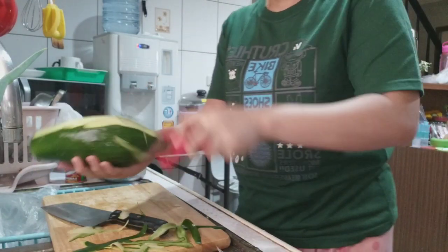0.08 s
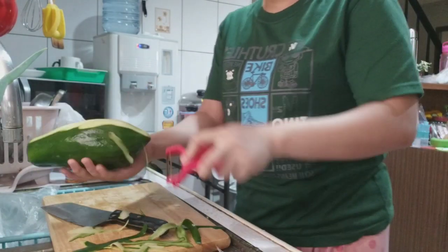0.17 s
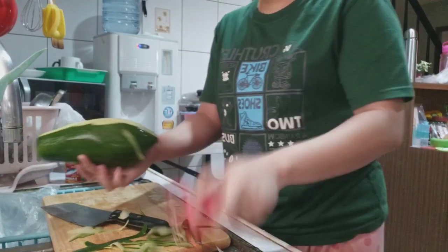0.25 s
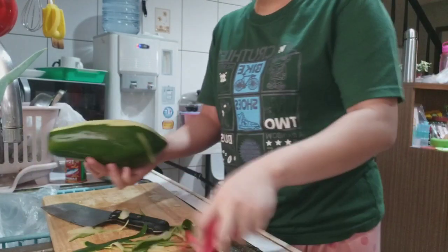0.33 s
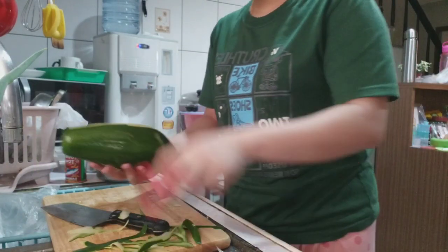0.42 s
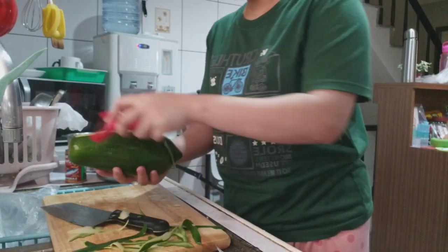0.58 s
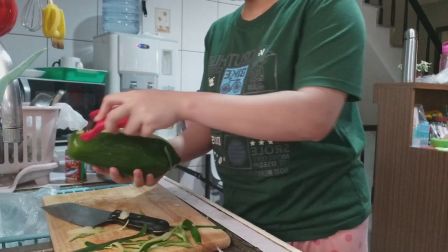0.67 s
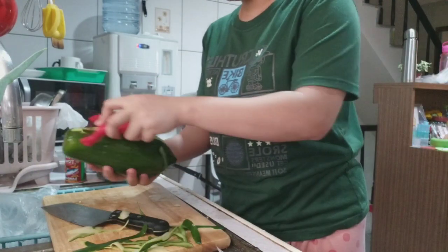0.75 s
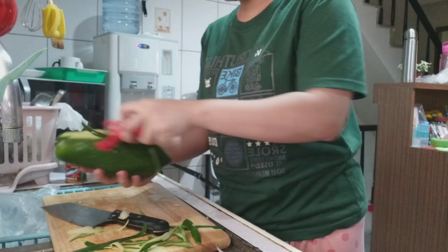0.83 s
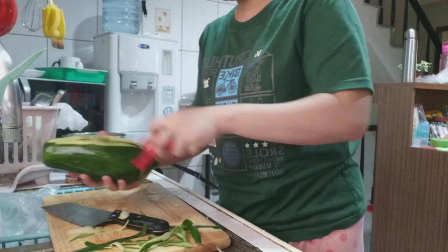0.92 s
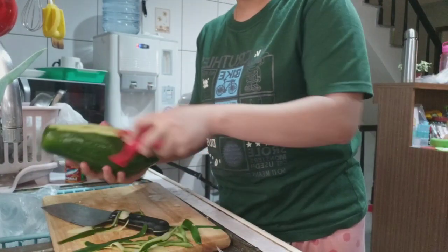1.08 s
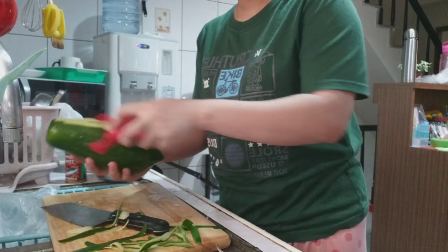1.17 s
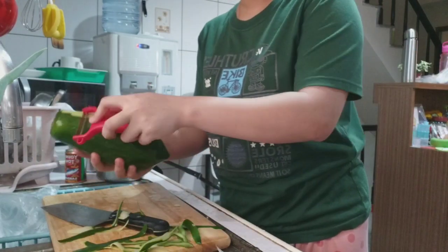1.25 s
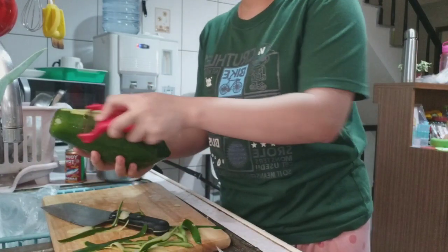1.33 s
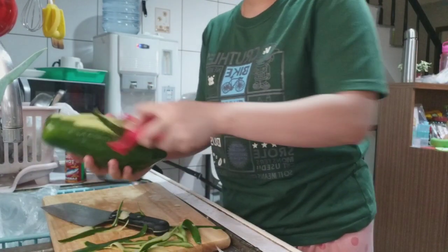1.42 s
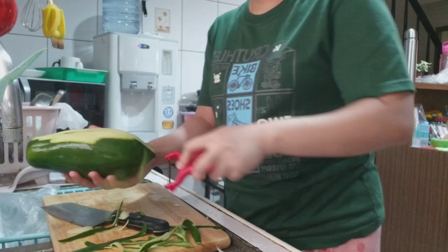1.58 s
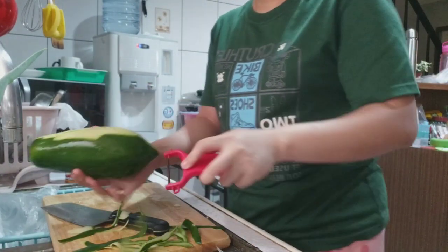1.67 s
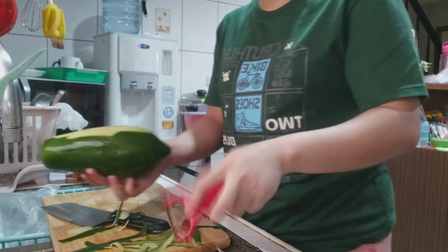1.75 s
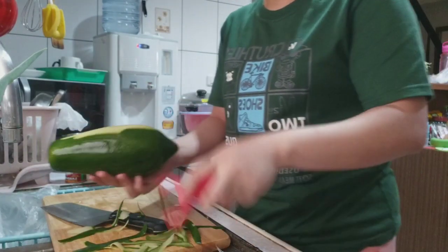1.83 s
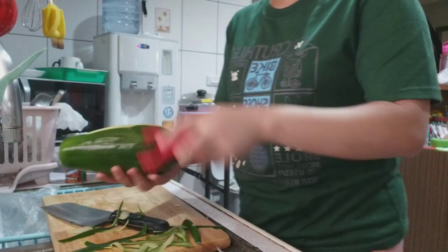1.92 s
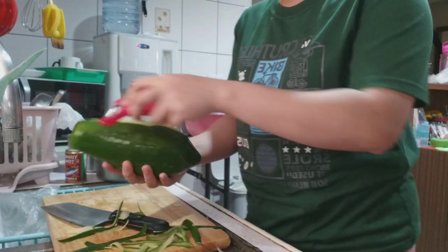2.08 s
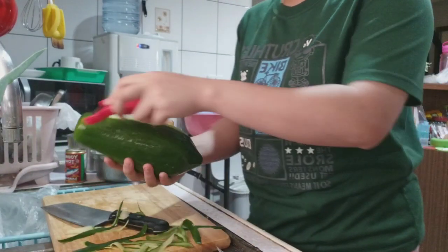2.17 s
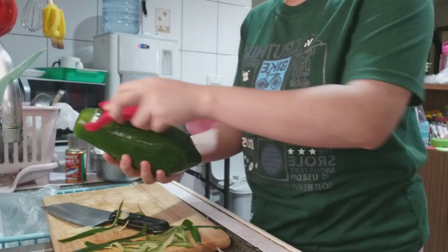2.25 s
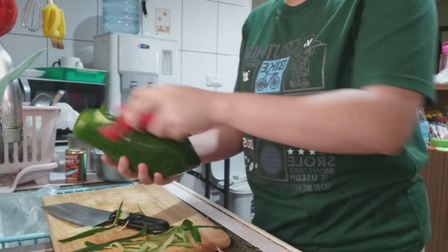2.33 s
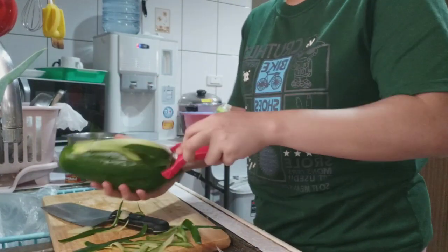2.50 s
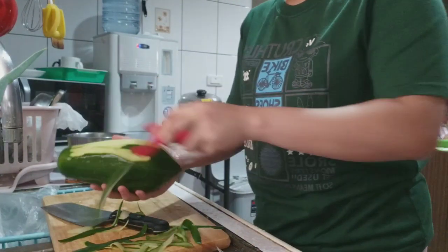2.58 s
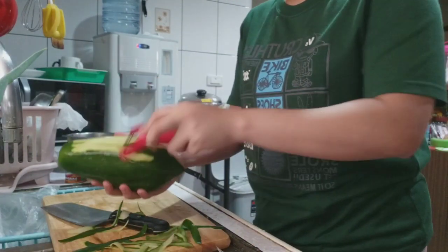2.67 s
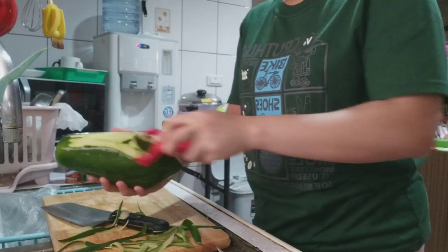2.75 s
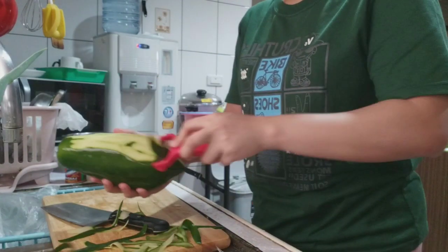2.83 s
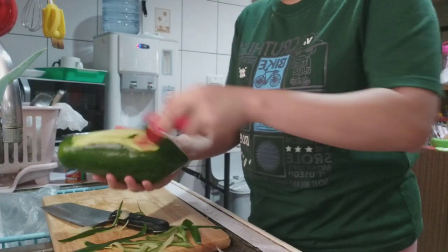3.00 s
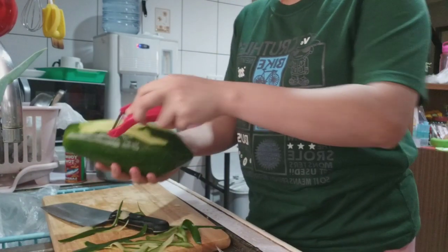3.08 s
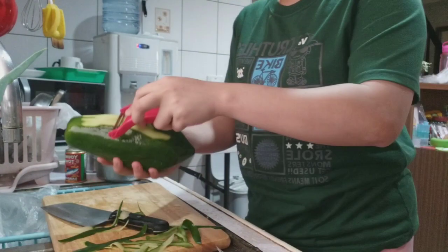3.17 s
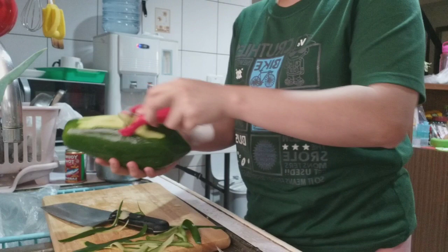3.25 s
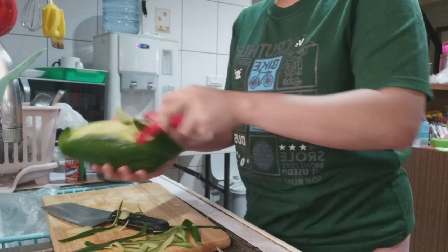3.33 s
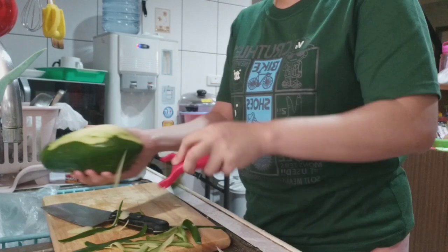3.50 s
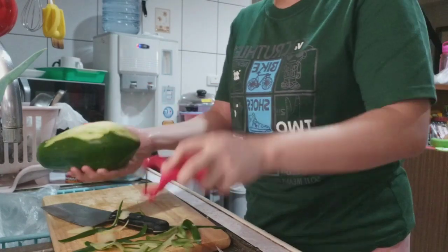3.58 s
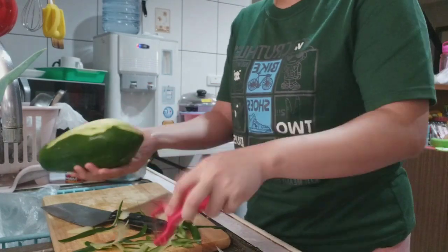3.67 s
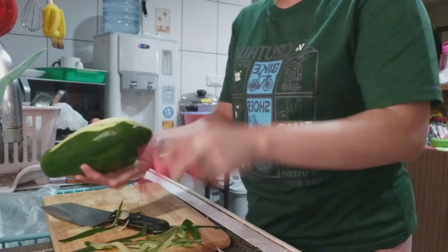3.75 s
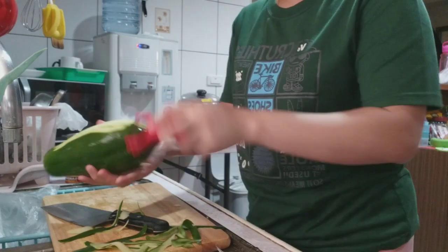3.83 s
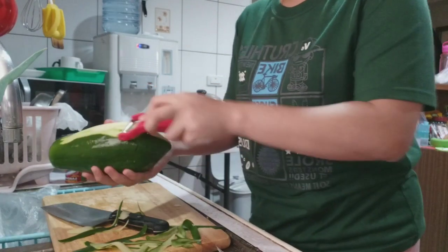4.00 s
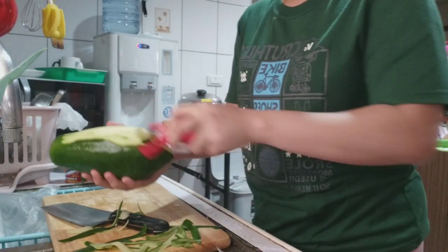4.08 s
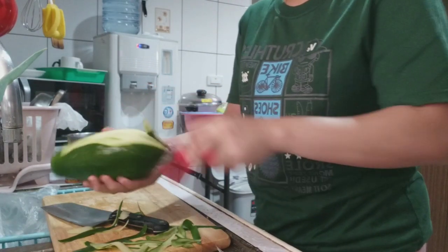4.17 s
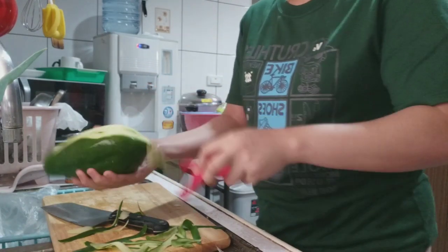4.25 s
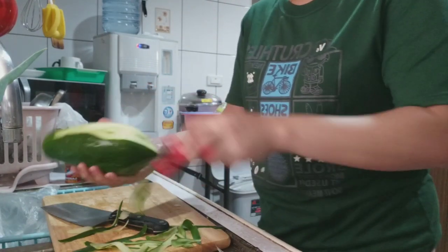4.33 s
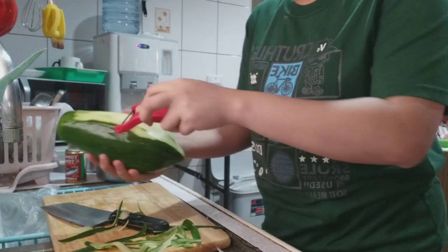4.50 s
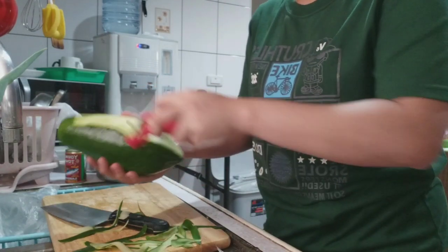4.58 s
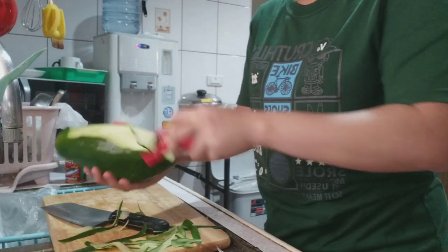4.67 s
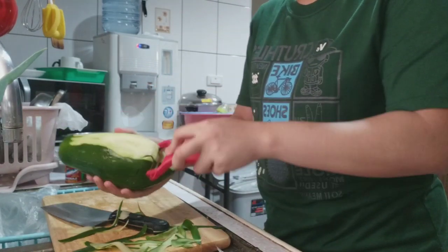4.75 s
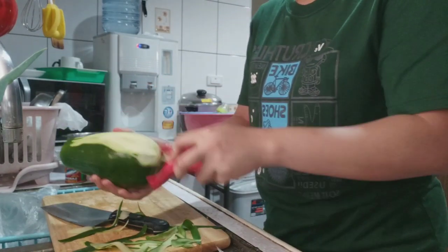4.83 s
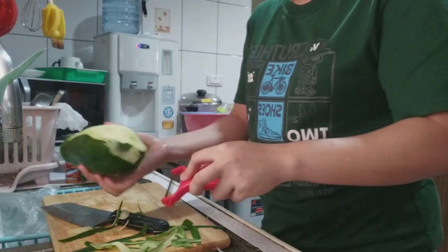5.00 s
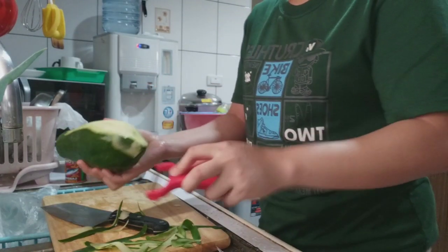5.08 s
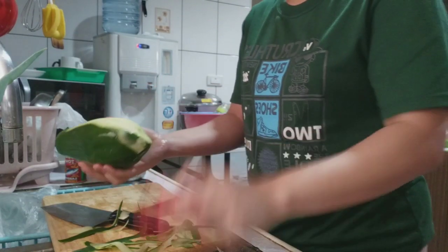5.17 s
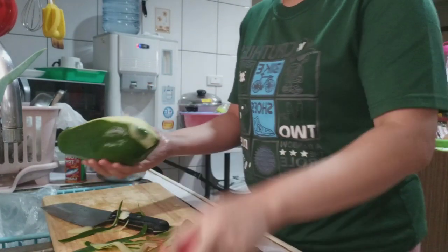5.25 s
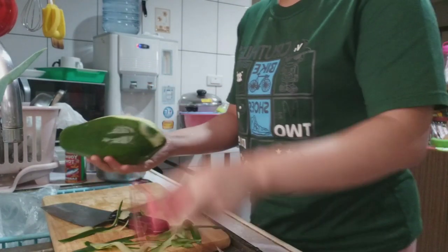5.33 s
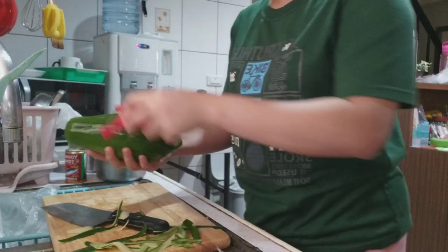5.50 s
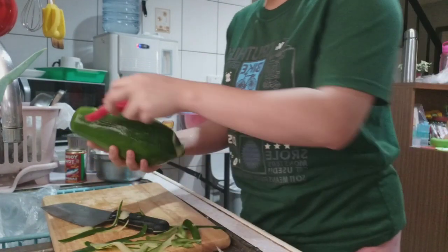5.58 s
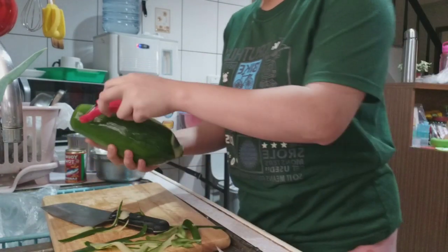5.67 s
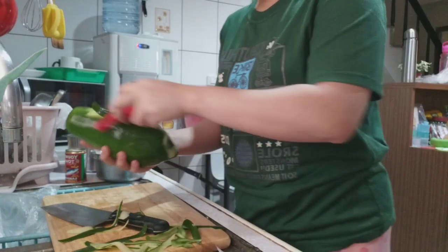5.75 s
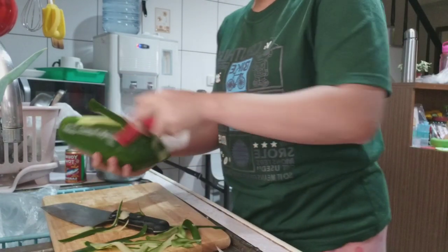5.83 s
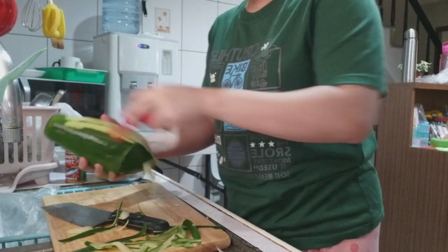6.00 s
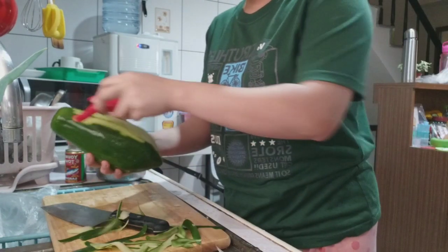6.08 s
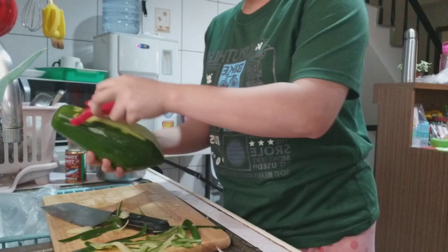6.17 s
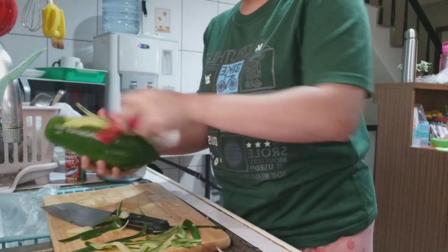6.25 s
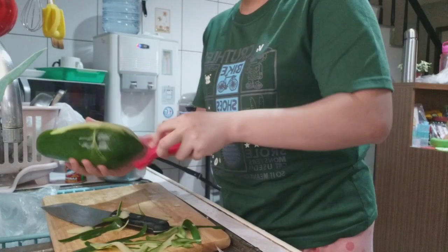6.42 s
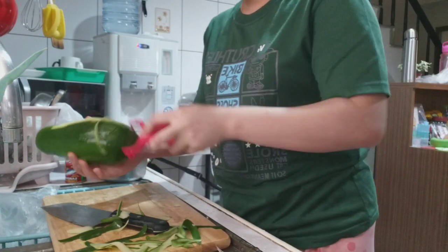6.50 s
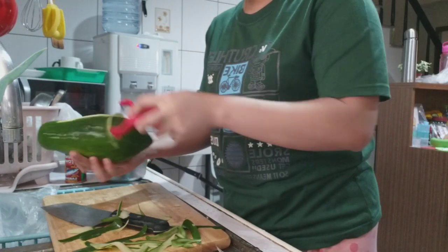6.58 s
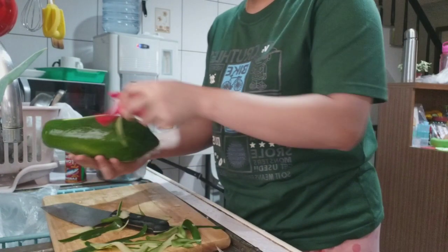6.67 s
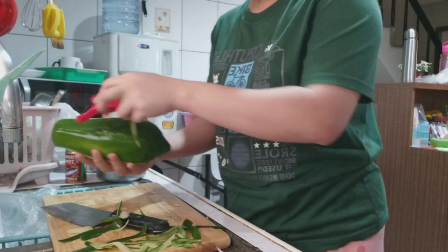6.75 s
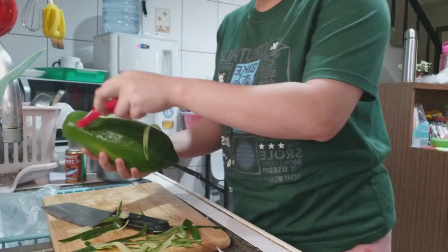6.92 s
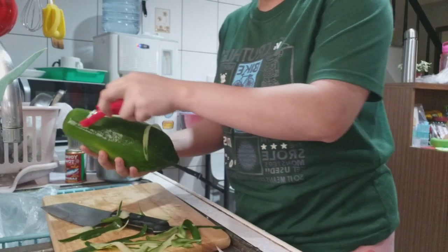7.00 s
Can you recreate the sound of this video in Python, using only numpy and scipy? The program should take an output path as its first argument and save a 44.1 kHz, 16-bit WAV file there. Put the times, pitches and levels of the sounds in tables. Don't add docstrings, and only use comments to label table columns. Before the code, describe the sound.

At arm's length in a tiled kitchen, a plastic-handled peeler works over a firm green fruit. A strong scrape is already underway at 0 s, fading into a small rattle; a brief nip follows at 0.2 s. A loud bite at 0.7 s opens a longer crackling tear, then another at 1.25 s, followed by loose clicks around 1.5 s and a light nip at 1.75 s. Strokes return at 2.2 and 2.7 s, the latter sharply bitten with a dull knock, and at 3.2 s, with faint fumbling until 3.9 s. The loudest bite lands near 3.95 s, with a rattle and ping at 4.16 s. A hollow double knock and bright scrape come at 4.5 s, a clear steel ping at 4.85 s. After quiet touches, weighty strokes rasp at 5.65 and 6.15 s; a weak last scrape starts near 6.9 s. Faint fridge hum and hiss continue throughout.

```python
import sys
import numpy as np
from scipy import signal
from scipy.fft import rfft, irfft
from scipy.io import wavfile
from scipy.ndimage import uniform_filter1d

SR = 44100
rng = np.random.default_rng(int(sys.argv[2]) if len(sys.argv) > 2 else 0)


def unload_wav(signal):
    wavfile.write(
        sys.argv[1],
        SR,
        np.round(np.clip(np.atleast_2d(signal).T, -1, 1) * 32767).astype(np.int16),
    )


def to_linear_factor(level_db):
    exponent = np.asarray(level_db, float) / 20
    return 10 ** exponent


N = 310023
T = np.arange(N) / SR


def peeler():
    judder = unit(to_linear_factor(1.7 * walk(380) + 0.5 * walk(60)))
    coarse, fine = snaps(7000, 0.64), snaps(22000, 1.1)
    drag, press, trail = strokes()
    bite, tick = bites(), rattles()
    wet = wetness()
    sound = plastic_frame(coarse, judder, drag, trail, bite[0])
    sound += fruit(coarse, judder, press, bite[1])
    sound += cutting_edge(fine, judder, wet, drag, bite[2] + tick[2])
    sound += juice(judder, wet, drag, bite[3] + tick[3])
    return sound + loose_handle(fine, tick[0], tick[1])


# (blade lands [s], drag at landing [dB], swell [s],
# drag at peak [dB], held after peak [s])
STROKE_ROWS = [(0.0, -20.5, 0.013, -26, 0.049), (0.245, -45, 0.023, -49, 0.0071),
               (0.701, -38.5, 0.13, -26, 0.052), (1.279, -41.5, 0.11, -27.5, 0.096),
               (2.218, -41, 0.15, -25.5, 0.061), (2.707, -33.5, 0.083, -35.5, .005),
               (3.171, -40.5, 0.16, -31.5, 0.075), (3.997, -32.5, 0.048, -33.5, 0.089),
               (4.544, -35, 0.061, -31.5, 0.052), (4.791, -45, 0.022, -50, 0.0065),
               (5.667, -44, 0.083, -30, 0.098), (6.155, -37.5, 0.15, -32.5, 0.04),
               (6.945, -42, 0.15, -40, 0.15)]


def strokes():
    land_s, sag_db_per_s, let_go_db_per_s = 0.02, 49.5, 315.5
    drag, press, trail = np.zeros((3, N))
    for s, land_db, swell, peak_db, held in STROKE_ROWS:
        t, end = T - s, swell + held
        end_db = peak_db - sag_db_per_s * held
        after = np.clip(T - s - end, 0, 2)
        drag_db = np.interp(t, [0, swell, end], [land_db, peak_db, end_db])
        on = np.clip(t / land_s + 1, 0, 1) * to_linear_factor(drag_db)
        force = on * to_linear_factor(-let_go_db_per_s * after)
        drag += force
        trail += on * to_linear_factor(-27 - 115.5 * after)
        press += force * to_linear_factor(np.interp(t, [0, end, end + 0.038], [-19, -7.5, -19.5]))
    return drag, press, trail


# (time [s], peak level [dB], brightness [dB],
# weight on the fruit [dB], decay T60 [s])
BITE_ROWS = [
    (0.216, -25.5, -10, -30, 0.056),
    (0.6784, -16.5, -8, -25.5, 0.09),
    (1.2353, -27.5, -14, -14, 0.083),
    (1.7402, -32.5, -3.5, -20, 0.086),
    (2.6615, -18.5, -3.5, -19, 0.1),
    (3.9615, -13, -9, -22, 0.085),
    (4.775, -35.5, -4.5, -22, 0.23),
    (5.6199, -24.5, -4.5, -13, 0.11),
    (6.1244, -28.5, -2.5, -9, 0.086),
]
# (time [s], peak level [dB], brightness [dB],
# weight on the fruit [dB], decay T60 [s])
LEAN_ROWS = [
    (1.2463, -20, -8.5, -26, 0.086),
    (2.192, -27, -4.5, -15.5, 0.074),
    (3.14, -31.5, -3.5, -20, 0.049),
    (3.338, -31.5, -3, -24, 0.076),
    (3.357, -21, -27, -12, 0.048),
    (4.5111, -22.5, 0, -16, 0.077),
    (6.912, -28.5, -5.5, -16, 0.068),
]
# (edge [dB], edge share of brightness, juice [dB], juice share of brightness)
BITE_BALANCE = (0.5, 1.36, -6, 0.67)


def bites():
    sharp = tap_force(BITE_ROWS, BITE_BALANCE, rise_s=0.0029, lead_s=0.0016)
    return sharp + tap_force(LEAN_ROWS, BITE_BALANCE, rise_s=0.006, lead_s=0.0042)


# (time [s], peak level [dB], brightness [dB],
# weight on the handle [dB], decay T60 [s])
RATTLE_ROWS = [(0.1171, -24.5, -6, -26, 0.089), (0.9504, -34.5, -8.5, -17, 0.13),
               (1.5015, -26.5, -16, -24, 0.1), (1.5764, -49, -10, -23, 0.12),
               (1.6851, -34.5, -21.5, -16, 0.2), (2.5078, -38.5, -11.5, -8, 0.1),
               (2.617, -48.5, -6.5, -10, 0.31), (2.6824, -52, -5, -22, 0.2), (2.9911, -42, -5, -16, 0.18),
               (3.239, -29, -28, -29, 0.29), (3.414, -27.5, -11, -18, 0.098), (3.5653, -47, 8.5, -10, 0.18),
               (3.6321, -45, 9.5, -10, 0.15), (4.1599, -25, -3, -7, 0.087),
               (4.7324, -36.5, -17, -15, 0.091), (4.7504, -40, -5, -14, 0.15),
               (4.8344, -31.5, -6, -5, 0.12), (4.8484, -39, 5, -13, 0.11), (5.119, -41, -1.5, -8, 0.29),
               (5.1861, -38, -12, -5, 0.072), (5.4705, -48, -15, -9.5, 0.29),
               (5.88, -30.5, -18.5, -16, 0.084), (6.354, -30, -7.5, -12, 0.14)]
# (time [s], peak level [dB], brightness [dB],
# weight on the handle [dB], decay T60 [s])
TOUCH_ROWS = [(3.125, -47, -19, -5, .15), (4.472, -61, -17, -7, 0.36), (0.291, -40, -18, -17, 0.068),
              (0.3284, -69, 14, -13, 0.13), (0.4574, -58, -3, -4, 0.073), (1.0644, -51.5, 0, -4.5, 0.082),
              (2.0594, -62.5, -7, 0, 0.13), (2.9644, -56, -6, -3, 0.41), (3.0944, -53, 5, -5, 0.14),
              (3.5244, -51, -2, -16, 0.14), (3.5503, -54.5, 2, -10, 0.17), (3.8, -58.5, -14, -1, 0.33),
              (3.8516, -51, -18.5, -1.5, 0.14), (3.8984, -46, -13, -13, 0.26), (3.93, -53, -16, -5, 0.22),
              (5.2599, -58.5, 9, -20.5, 0.12), (6.0384, -55, 11.5, -4, 0.22), (6.6194, -81, 19, -2, 0.13),
              (6.7401, -61.5, -5, -3, 0.099)]


def rattles():
    rattle = tap_force(RATTLE_ROWS, (-1.3, 0.67, 0.3, 1.31), rise_s=0.0003)
    touch = tap_force(TOUCH_ROWS, (-5.5, 0.4, 0.3, 1.17), rise_s=0.0004)
    return to_linear_factor(-3.5) * (rattle + touch)


# (time [s], level [dB])
WETNESS_POINTS = [(0.05, -2.3), (0.85, -2.2), (1.4, -1), (2.35, -0.5), (2.75, 4.5), (3.3, 1), (4.1, 2.5),
                  (4.6, 3.5), (4.85, 6.5), (5.75, 1.3), (6.2, 0.5), (6.35, 0), (7.0, -4.5)]


def wetness():
    return to_linear_factor(np.interp(T, *np.transpose(WETNESS_POINTS)))


# (frequency [Hz], width [Hz], level [dB])
FRAME_MODES = [(2480, 260, -7), (2850, 260, 0), (3230, 220, -3), (3500, 180, -4), (3820, 220, 0),
               (4170, 320, -5), (4750, 800, -12)]
# (frequency [Hz], width [Hz], level [dB])
HOLLOW_MODES = [(2787, 100, 0.5), (2815, 99, 2.5)]
# (frequency [Hz], width [Hz], level [dB])
JAW_MODES = [(2696, 390, 0.5), (3267, 294, 2), (3640, 270, 2.5), (4280, 120, 1.5)]


def plastic_frame(coarse, judder, drag, trail, bite):
    hard_db = -21
    hard = to_linear_factor(hard_db - 4) * (drag / to_linear_factor(hard_db)) ** 1.04
    frame = body(coarse * judder * to_linear_factor(-1.5) * (drag + trail), FRAME_MODES, patchy_db=2.0, rate=25)
    hollow = body(coarse * judder * hard, HOLLOW_MODES, patchy_db=3.0, rate=34)
    jaws = body(coarse * to_linear_factor(-4) * bite, JAW_MODES, patchy_db=1.2, rate=15)
    return frame + hollow + jaws


# (frequency [Hz], width [Hz], level [dB])
FRUIT_MODES = [(923, 300, -8.5), (1347, 153, 0.5), (1592, 98, 4), (1898, 208, 2), (2265, 130, 2)]
# (frequency [Hz], width [Hz], level [dB])
FLESH_MODES = [(520, 150, -2), (670, 170, 0), (860, 200, -4)]


def fruit(coarse, judder, press, bite):
    firm_db = -31
    deep = to_linear_factor(firm_db - 17.5) * (press / to_linear_factor(firm_db)) ** 1.49
    whole = body(coarse * (judder * press + bite), FRUIT_MODES, patchy_db=3.0, rate=27)
    return whole + body(coarse * judder * deep, FLESH_MODES, patchy_db=1.5, rate=25)


# (frequency [Hz], width [Hz], level [dB])
EDGE_MODES = [(4820, 350, -7.5), (5676, 487, 1), (6460, 636, -3.5), (7880, 1700, -8)]


def cutting_edge(fine, judder, wet, drag, taps):
    tearing = judder ** 0.37 * wet * saturate(drag, db=-4, cap_db=-43)
    edge = body(fine * tearing, EDGE_MODES, patchy_db=2.5, rate=40)
    return edge + body(fine * taps, EDGE_MODES, patchy_db=6.45, rate=40)


# (frequency [Hz], width [Hz], level [dB])
SIZZLE_MODES = [(8420, 2000, -3), (9890, 1200, 1), (11420, 1400, -0.5), (13800, 1300, 1),
                (15000, 820, -4.5)]


def juice(judder, wet, drag, taps):
    spray = judder ** 0.35 * wet * saturate(drag, db=-6, cap_db=-33.5) + taps
    return body(snaps(22000, 1.5) * spray, SIZZLE_MODES, patchy_db=2.5, rate=32)


# (frequency [Hz], width [Hz], level [dB])
PIVOT_MODES = [(2750, 550, -2), (3450, 750, 0), (4350, 800, -3)]
# (frequency [Hz], width [Hz], level [dB])
HANDLE_MODES = [(1450, 500, -13), (1900, 150, 0)]


def loose_handle(fine, pivot_force, handle_force):
    pivots = body(fine * pivot_force, PIVOT_MODES, patchy_db=1.0, rate=28)
    return pivots + body(fine * handle_force, HANDLE_MODES, patchy_db=4.5, rate=28)


# (time [s], peak level [dB], lower mode [dB rel],
# upper mode [dB rel], freedom to ring [0-1])
PING_ROWS = [(0.1156, -46.5, 13.5, -10, 0.7), (0.1344, -59, -1, -9, .55), (0.2204, -51, 4, -3, .6),
             (0.2753, -46, 3, -16, 0.5), (0.9497, -53, 1, -20, .5), (1.5014, -57, 6, -4, .5),
             (1.7434, -45, 5, 3, 0.8), (3.6331, -39, -13.5, -2.5, .7), (4.1634, -31, -6, -2, 0.7),
             (4.8484, -23.5, -6, -14, 0.67), (5.1224, -50, 4, 11.5, .6), (5.2599, -60, -11.5, -23, 0.5),
             (6.372, -62, 14, -4, .6)]
# (frequency [Hz], decay T60 [s])
BLADE_MODES = [(11670, .085), (9500, 0.085), (15050, .09)]


def blade():
    out, t = np.zeros(N + SR // 2), T[:SR // 2]
    phases = rng.random((len(PING_ROWS), 3))
    for (s, db, *rel_db, free), phase in zip(PING_ROWS, phases):
        k = int(s * SR)
        for (hz, t60), rel, turn in zip(BLADE_MODES, [0, *rel_db], phase):
            pair = np.sin(2 * np.pi * hz * t) + 0.51 * np.sin(2 * np.pi * ((hz + 18) * t + turn))
            ring_s = 2.5 * t60 * np.clip(free, 0.1, 1.5)
            decay = (1 - np.exp(-t / 0.0092)) * 1000. ** (-t / ring_s)
            out[k:k + len(t)] += to_linear_factor(db + rel - 5.5) * pair * decay
    return out[:N] * to_linear_factor(1.7 * walk(70))


# (middle [s], half length [s], level [dB], pitch [Hz])
DIG_ROWS = [(0.042, 0.016, -41, 1040), (0.823, 0.043, -50.5, 603), (0.898, .03, -55, 1200),
            (1.407, 0.057, -55, 605), (2.447, 0.037, -63, 800), (3.25, 0.023, -62.5, 970),
            (3.377, 0.016, -51.5, 687), (4.126, 0.027, -51.5, 820), (4.628, 0.037, -38, 1394),
            (4.623, 0.043, -51, 357), (5.783, .05, -56.5, 612), (5.757, 0.025, -55, 1070),
            (6.308, 0.019, -51.5, 850)]


def digs():
    tearing, out = snaps(1500, 2.1), np.zeros(N)
    for s, half, db, hz in DIG_ROWS:
        width_hz = 0.22 * hz
        groan = unit(resonate(resonate(tearing, hz, width_hz), hz, width_hz))
        out += to_linear_factor(db) * np.exp(-((T - s) / half) ** 2) * groan
    return out


# (time [s], peak level [dB], pitch [Hz], decay T60 [s])
KNOCK_ROWS = [(0.245, -40.5, 560, 0.12), (1.245, -54, 490, 0.15), (2.665, -34.5, 456, 0.13),
              (2.699, -55, 775, 0.23), (3.039, -55, 273, 0.24), (3.097, -43.5, 603, 0.47),
              (3.552, -44.5, 272, 0.17), (3.578, -45, 254, 0.13), (3.783, -43, 220, 0.15),
              (3.817, -51, 181, 0.15), (3.965, -38, 400, 0.13), (4.53, -22, 442, 0.09),
              (4.544, -22, 653, 0.12), (4.556, -29, 682, 0.44), (4.59, -37.5, 350, 0.18),
              (5.131, -67, 199, 0.13)]


def knocks():
    out, t = np.zeros(N + SR // 2), T[:SR // 3]
    rumbles = rng.standard_normal((len(KNOCK_ROWS), len(t)))
    for (s, db, hz, t60), rumble in zip(KNOCK_ROWS, rumbles):
        blow = rumble * (1 - np.exp(-t / 0.0043)) * 1000. ** (-t / np.clip(t60, 0.02, 0.4))
        blow = resonate(resonate(blow, hz, 2.0 * hz), hz, 2.0 * hz)
        ring = resonate(blow, hz, 0.088 * hz)
        ring += 0.78 * resonate(blow, 1.33 * hz, 0.5 * hz)
        ring += 0.51 * resonate(blow, 0.649 * hz, 0.3 * hz)
        k = int(s * SR)
        out[k:k + len(t)] += to_linear_factor(db - 3.0) * ring / np.abs(ring).max()
    return out[:N]


def tiled_room(near):
    t60_s, level_db, dull_hz = 0.28, -9.5, 6360
    t = T[:SR // 2]
    tail = rng.standard_normal(len(t)) * 1000. ** (-t / t60_s) * np.clip(t / 0.00094, 0, 1)
    tail = signal.lfilter(*signal.butter(1, dull_hz, fs=SR), tail)
    return near + to_linear_factor(level_db) * signal.fftconvolve(near, tail / np.linalg.norm(tail))[:N]


# (frequency [Hz], density [dB/Hz])
AIR_SPECTRUM = [(25, -41.5), (59, -13.5), (119, -4), (240, -21.5), (340, -21.5), (1200, -30.5),
                (2640, -36.5), (15600, -41.5)]


def kitchen():
    hum_hz, width_hz = 120.4, 7
    hum = resonate(rng.standard_normal(N), hum_hz, width_hz)
    hum = unit(resonate(hum, hum_hz, 2 * width_hz))
    air = colour(rng.standard_normal(N), AIR_SPECTRUM) * to_linear_factor(0.41 * walk(3.4))
    return to_linear_factor(-63) * hum + to_linear_factor(-61) * air


# (frequency [Hz], width [Hz], level [dB])
PORT_BANDS = [(1916, 660, -11), (9900, 500, -7.5)]
# (frequency [Hz], density [dB/Hz])
HISS_SPECTRUM = [(59, -63), (100, -22), (134, -13), (1340, -9.5), (2230, -5.5), (2480, -7), (6030, -5.5),
                 (15600, -7.5)]


def microphone_difference(mid):
    low, high = (to_linear_factor(db) * resonate(resonate(mid, hz, w), hz, w) for hz, w, db in PORT_BANDS)
    hiss = to_linear_factor(-76) * colour(rng.standard_normal(N), HISS_SPECTRUM)
    return low - high + to_linear_factor(-34) * resonate(mid, 6500, 12000) + hiss


def tap_force(rows, tilt, rise_s, lead_s=0.):
    force, t = np.zeros((4, N + SR // 2)), T[:SR // 3]
    edge_db, edge_share, juice_db, juice_share = tilt
    for s, db, bright_db, weight_db, t60 in rows:
        shape = (1 - np.exp(-t / rise_s)) ** 2 * 1000. ** (-t / np.clip(t60, 0.01, 0.4))
        parts_db = np.array([0, weight_db, edge_db + edge_share * bright_db, juice_db + juice_share * bright_db])
        k = int((s - lead_s) * SR)
        force[:, k:k + len(t)] += np.outer(to_linear_factor(db - 2.0 + parts_db), shape / shape.max())
    return force[:, :N]


def snaps(rate, spread_db):
    burst = rng.random(N) < rate / SR
    size_db = spread_db * rng.exponential(size=N)
    return unit(burst * rng.standard_normal(N) * to_linear_factor(size_db))


def body(x, modes, patchy_db, rate):
    power = sum(to_linear_factor(2 * db) * w for hz, w, db in modes) * 4.47 / SR
    out = np.zeros(N)
    for k, (hz, w, db) in enumerate(modes):
        share = to_linear_factor(db + patchy_db * walk(rate))
        ring = resonate(resonate(share * x, hz, 1.63 * w), hz, 1.63 * w)
        out += (-1) ** k * ring
    return out / np.sqrt(power)


def resonate(x, hz, width_hz):
    return signal.lfilter(*signal.iirpeak(hz, hz / width_hz, fs=SR), x)


def saturate(force, db, cap_db):
    return force * to_linear_factor(db) / (1 + force * to_linear_factor(db - cap_db))


def walk(rate):
    k = int(SR / rate)
    steps = np.repeat(rng.standard_normal(N // k + 1), k)[:N]
    return unit(uniform_filter1d(steps, k))


def unit(x):
    return x / np.sqrt(np.mean(x ** 2))


def colour(x, points):
    hz, db = np.transpose(points)
    f = np.arange(1, 4098) * SR / 8194
    curve_db = np.interp(np.log(f), np.log(hz), db, left=db[0] - 29, right=-90)
    cepstrum = irfft(np.log(to_linear_factor(curve_db)))
    cepstrum[1:4096] *= 2
    cepstrum[4097:] = 0
    h = irfft(np.exp(rfft(cepstrum)))[:4096]
    return signal.fftconvolve(x, h / np.linalg.norm(h))[:N]


def scene():
    mid = tiled_room(peeler() + blade() + digs() + knocks())
    side = microphone_difference(mid)
    return mid + kitchen() + side * np.array([[1], [-1]])


def low_pass(x):
    return signal.sosfilt(signal.butter(12, 16710, fs=SR, output="sos"), x)


def record(dry):
    top_cut = signal.ellip(6, 0.3, 36, 15550, fs=SR, output="sos")
    mix = signal.sosfilt(top_cut, dry)
    return low_pass(mix)


dry = scene()
out = record(dry)
unload_wav(out)
```